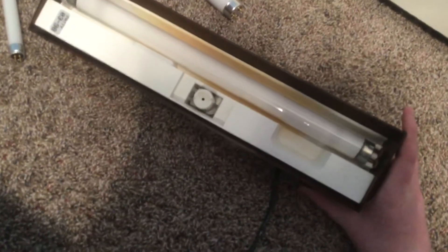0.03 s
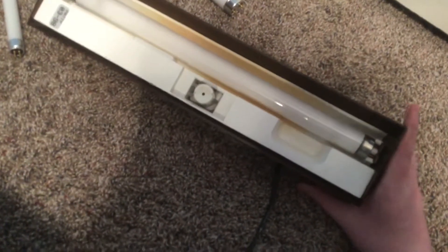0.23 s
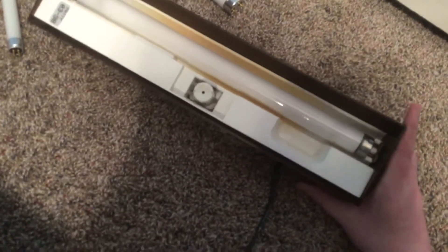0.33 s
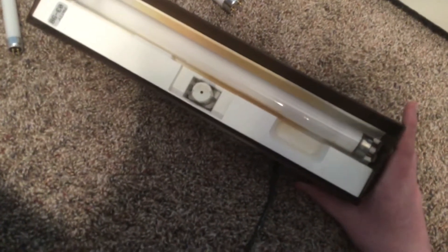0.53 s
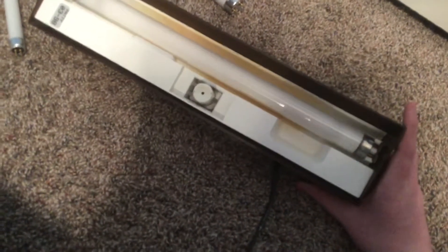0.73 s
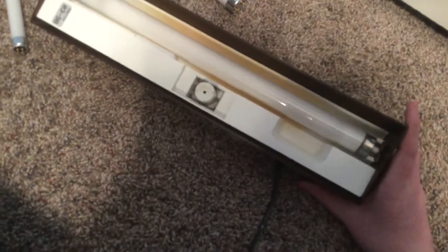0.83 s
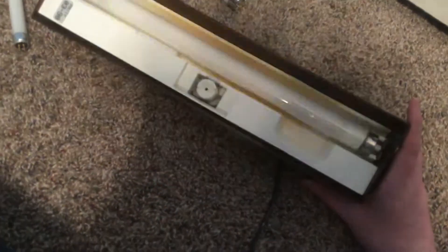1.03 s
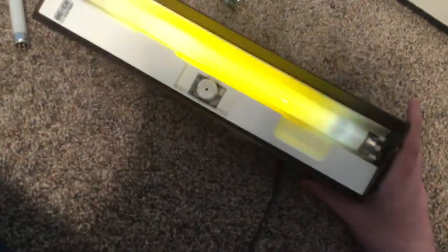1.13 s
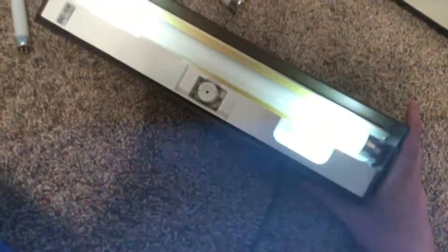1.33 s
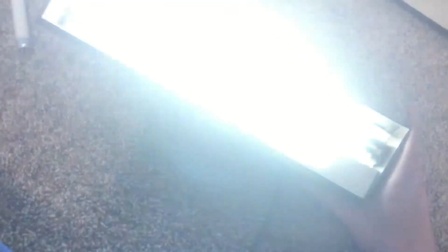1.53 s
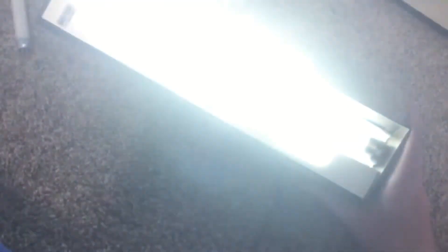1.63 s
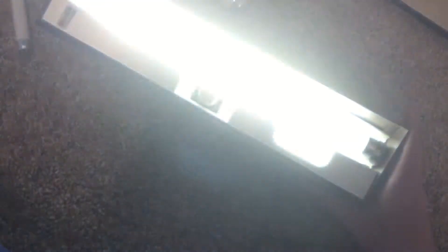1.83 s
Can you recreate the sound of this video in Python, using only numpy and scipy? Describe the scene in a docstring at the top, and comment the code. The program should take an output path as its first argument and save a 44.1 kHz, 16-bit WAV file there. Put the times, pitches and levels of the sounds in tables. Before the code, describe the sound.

A push switch clicks sharply, close by, at about 0.2 seconds and springs back with a second click at 0.35. A fluorescent tube's starter gives much weaker glassy pings near 0.85, 1.05, 1.2 and 1.5 seconds, the middle two doubled. From 1.5 seconds the lit tube holds a very faint, high, pulsing whine and thin sizzle. A soft low room rumble runs throughout, with little echo.

```python
"""A push switch clicks down and springs back, close by, over the low rumble of a carpeted room.
Each throw cracks the contacts and rings the housing. A fluorescent tube then tries to strike:
its starter pings six times, ringing a small glass bulb and knocking the fitting's casing.
Once lit, the tube gives a faint high whine and a thin sizzle, both pulsing with the mains."""
import sys
import numpy as np
from scipy import signal
from scipy.fft import rfft, irfft
from scipy.io import wavfile
from scipy.ndimage import uniform_filter1d

SR = 44100
rng = np.random.default_rng(int(sys.argv[2]) if len(sys.argv) > 2 else 0)


def dump(signal):
    """Clip the signal to [-1, 1] and save it as 16-bit WAV at the path in sys.argv[1]."""
    limited = np.clip(np.atleast_2d(signal).T, -1, 1)
    pcm = np.round(limited * 32767).astype(np.int16)
    wavfile.write(sys.argv[1], SR, pcm)


N = 83790
TIME = np.arange(N) / SR
ROOM_ONSET_S = .005
TILT_PIVOT_HZ = 11170


def from_db(db):
    """Decibels to gain."""
    return 10 ** (np.asarray(db) / 20)


def noise(colour, white=None):
    """Unit-rms noise, shaped by rows of frequency in Hz, relative density in dB."""
    points_hz, points_db = np.array(colour, float).T
    white = rng.standard_normal(N) if white is None else white
    hz = np.maximum(np.fft.rfftfreq(N, 1 / SR), 1)
    gain = from_db(np.interp(np.log(hz), np.log(points_hz), points_db))
    x = irfft(rfft(white) * gain, N)
    return x / x.std()


def strike(start_s, rise_s, t60_s):
    """Envelope of a blow: linear rise, exponential decay."""
    age_s = np.maximum(TIME - start_s, 0)
    return np.minimum(age_s / rise_s, 1) * np.exp(-np.log(1000) * age_s / t60_s)


def ring(start_s, rise_s, modes, build_cycles=2.5):
    """Struck, damped modes: low ones build up later, neighbours swing in opposite directions."""
    out = 0
    for k, (hz, db, t60_s) in enumerate(modes):
        envelope = strike(start_s, rise_s + build_cycles / hz, t60_s)
        out += (-1) ** k * from_db(db) * envelope * np.sin(2 * np.pi * hz * (TIME - start_s))
    return out


def swell(colour, levels, window_s=.06):
    """Noise, evened out, then led along a level curve."""
    x = noise(colour)
    times_s, db = np.transpose(levels)
    power = uniform_filter1d(x ** 2, int(window_s * SR))
    power = uniform_filter1d(power, int(window_s * SR / 2))
    return from_db(np.interp(TIME, times_s, db)) * x / np.sqrt(power + 1e-9)


def rumble(floor_db=-61.5, drone_half_width_hz=5):
    """Room rumble and hiss with wavering drones; two low bands an octave apart swell separately."""
    # Each row: frequency in Hz, relative density in dB.
    floor_colour = [(20, -41), (32, -29), (50, -13), (75, -8), (105, -9), (150, -11), (190, -9), (290, -13),
                    (380, -23), (480, -28), (1000, -36.5), (1600, -43), (2400, -44.3), (4500, -51),
                    (12000, -52), (15000, -50), (15800, -63)]
    deep_colour = [(30, -55), (52, -19), (65, -1), (74, 1), (88, -5), (105, -14), (400, -120)]
    octave_colour = [(90, -45), (120, -12), (140, 1), (160, -5), (180, -13), (550, -120)]
    # Each row: time in seconds, level in dB.
    deep_levels = [(0.03, -51), (0.075, -62), (0.13, -53), (0.23, -59), (0.31, -53), (0.45, -59),
                   (0.8, -59), (0.9, -54), (1.12, -53), (1.2, -59), (1.34, -52), (1.5, -60), (1.63, -65),
                   (1.74, -60), (1.82, -52), (1.9, -57)]
    octave_levels = [(0, -61), (0.2, -53), (0.29, -60), (0.41, -66), (0.48, -58), (0.57, -60), (0.63, -52),
                     (0.72, -60), (0.81, -55), (1.06, -65), (1.15, -55), (1.21, -65), (1.27, -58),
                     (1.56, -56), (1.64, -65), (1.82, -51), (1.9, -57)]
    # Each row: centre in Hz, level in dB.
    drones = [(222, -71), (284, -70), (408, -84)]
    out = from_db(floor_db) * noise(floor_colour)
    hz = np.fft.rfftfreq(N, 1 / SR)
    for centre_hz, db in drones:
        peak = 1 / (1 + ((hz - centre_hz) / drone_half_width_hz) ** 2)
        drone = irfft(rfft(rng.standard_normal(N)) * peak, N)
        out += from_db(db) * drone / drone.std()
    return out + swell(deep_colour, deep_levels) + swell(octave_colour, octave_levels)


def room(x, t60_s=.16, wet_db=-17):
    """Short diffuse tail of a furnished room."""
    # Each row: frequency in Hz, relative density in dB.
    tail_colour = [(200, 0.5), (1000, 1.5), (3000, 0.5), (7000, -1), (9800, 2.5), (11200, -1), (13000, -2),
                   (16000, -2.5)]
    tail = noise(tail_colour) * strike(ROOM_ONSET_S, ROOM_ONSET_S, t60_s)
    return from_db(wet_db) * signal.fftconvolve(x, tail / np.linalg.norm(tail))[:N]


def hand():
    """Faint rustles that swell and fade, like a hand on the fitting."""
    # Each row: crest time in seconds, length in seconds, level in dB.
    rustles = [(0.695, .05, -81), (1.70, .07, -82)]
    # Each row: frequency in Hz, relative density in dB.
    rustle_colour = [(800, -14), (1700, -6), (2500, 0), (3300, -9), (6000, -20), (16000, -30)]
    envelope = sum(from_db(db) * np.exp(-(2 * (TIME - crest_s) / length_s) ** 2)
                   for crest_s, length_s, db in rustles)
    return noise(rustle_colour) * envelope


def lamp(mains_hz=59.98, crest_s=1.713, whine_hz=11158, sizzle_lead_s=.0005):
    """The tube's whine swells once per mains cycle, its sizzle twice."""
    # Each row: time in seconds, whine crest level in dB, sizzle crest level in dB.
    levels = [(0.83, -115, -110), (0.9, -90, -91), (1.46, -90, -91), (1.5, -76, -76), (1.62, -77, -76),
              (1.68, -67.5, -76), (1.76, -66, -76), (1.9, -72.5, -76)]
    # Each row: frequency in Hz, relative density in dB.
    sizzle_colour = [(4000, -22), (8800, -14), (9800, 1), (11500, 2), (12200, -16), (13200, -5),
                     (15000, -2), (15500, -22)]
    times_s, whine_db, sizzle_db = np.transpose(levels)
    mains_rad = 2 * np.pi * mains_hz * (TIME - crest_s)
    whine = np.cos(mains_rad / 2) ** 4 * np.sqrt(2) * np.sin(2 * np.pi * whine_hz * TIME)
    whine *= from_db(np.interp(TIME, times_s, whine_db))
    repeat_share = .7  # of the sizzle's power, the same in every cycle
    repeating = np.resize(rng.standard_normal(round(SR / mains_hz)), N)
    white = np.sqrt(repeat_share) * repeating + np.sqrt(1 - repeat_share) * rng.standard_normal(N)
    pulses = np.abs(np.cos(mains_rad + 2 * np.pi * mains_hz * sizzle_lead_s)) ** .9
    sizzle = from_db(np.interp(TIME, times_s, sizzle_db)) * pulses * noise(sizzle_colour, white)
    return whine + sizzle


def voiced(modes, tilt_db_oct=0, spread_db=2):
    """Modes as one ping excites them: tilted in brightness, each slightly random in strength."""
    return [(hz, db + tilt_db_oct * np.log2(hz / TILT_PIVOT_HZ) + spread_db * rng.uniform(-1, 1), t60_s)
            for hz, db, t60_s in modes]


def starter(rise_s=.0009, knock_db=-2):
    """Each try at striking the tube ticks the contacts, rings the glass bulb and knocks the casing."""
    # Each row: start in seconds, bulb, contact and casing gains in dB, tilt in dB per octave.
    pings = [(0.8497, -39.5, -46, -64.5, -7), (1.0364, -50, -45.5, -56.5, 7), (1.0598, -50.5, -50, -68, 4),
             (1.2112, -38, -42, -57, 3), (1.2344, -55, -55, -74, 2), (1.4771, -38.5, -42, -60, 0)]
    # Each row: mode frequency in Hz, relative level in dB, T60 in seconds.
    bulb_modes = [(6300, -28, .016), (8430, -24, .025), (9400, -13, .02), (9850, -8, .017),
                  (10400, -14, .018), (11170, 1, .024), (12750, -18, .02), (13200, -13, .014),
                  (14200, -17, .014), (14900, -7.5, .016)]
    casing_modes = [(1100, -5, .03), (1560, -5, .03), (1970, -1, .028), (2750, -4, .022), (3150, -6, .022),
                    (4490, -4, .02), (5350, -12, .02)]
    # Each row: frequency in Hz, relative density in dB.
    knock_colour = [(300, -9), (1000, -0.5), (1900, 0), (2800, -2), (3700, -7), (8000, -9), (16000, -13)]
    contact_colour = [(5000, -38), (7800, -19.5), (10000, 1), (12200, -8), (15000, -3.5), (16000, -22)]
    knock = from_db(knock_db) * noise(knock_colour)
    out = 0
    for start_s, bulb_db, contact_db, casing_db, tilt_db_oct in pings:
        tilted = [(hz, db + tilt_db_oct * np.log2(hz / TILT_PIVOT_HZ)) for hz, db in contact_colour]
        contact = noise(tilted) * strike(start_s, rise_s, t60_s=.016)
        bulb = ring(start_s, rise_s, voiced(bulb_modes, tilt_db_oct))
        casing = ring(start_s, rise_s, voiced(casing_modes))
        casing += knock * strike(start_s, rise_s, t60_s=.028)
        out += from_db(bulb_db) * bulb + from_db(contact_db) * contact + from_db(casing_db) * casing
    return out


def finger(housing_modes, rise_s=.002, softness_hz=3500, rock_s=.2945):
    """A soft fingertip rubs the button, barely moving the high modes; the held button rocks once."""
    # Each row: start in seconds, rub level in dB, rub T60 in seconds, housing gain in dB.
    rubs = [(0.1905, -53.5, .2, -32), (0.2937, -53, .14, -30)]
    # Each row: frequency in Hz, relative density in dB.
    rub_colour = [(300, -14), (800, -3), (2000, 0), (4000, -2), (5000, -8), (7000, -7), (9000, -15),
                  (16000, -17)]
    # Each row: mode frequency in Hz, level in dB, T60 in seconds.
    button_modes = [(850, -57, .05), (1945, -49, .035), (2620, -51, .035), (3945, -50, .024)]
    softened = [(hz, db - 20 * np.log10(1 + (hz / softness_hz) ** 2), t60_s)
                for hz, db, t60_s in housing_modes]
    friction = noise(rub_colour)
    out = ring(rock_s, rise_s, button_modes)
    for start_s, rub_db, t60_s, ring_db in rubs:
        out += from_db(rub_db) * strike(start_s, rise_s, t60_s) * friction
        out += from_db(ring_db) * ring(start_s, rise_s, softened)
    return out


def bounce(rise_s=.0004):
    """The switch's parts clack as they settle after each throw."""
    # Each row: start in seconds, level in dB, T60 in seconds.
    clacks = [(0.2122, -28, .012), (0.3573, -30, .012), (0.3612, -36, .012)]
    # Each row: frequency in Hz, relative density in dB.
    clack_colour = [(400, -18), (1000, -4), (2200, -4), (3200, -7), (4100, 1), (5200, -3), (7000, -2),
                    (9000, -8), (16000, -16)]
    envelope = sum(from_db(db) * strike(start_s, rise_s, t60_s) for start_s, db, t60_s in clacks)
    return noise(clack_colour) * envelope


def snap(start_s, throw, modes):
    """One throw: contact crack, housing ring, dull body knock and their scatter in the room."""
    # Each row: frequency in Hz, relative density in dB.
    crack_colour = [(300, -16), (1000, -7), (2500, 0), (5000, -2.5), (8000, -1), (11500, 0), (15000, 0),
                    (16000, -6)]
    knock_colour = [(100, -10), (270, 4), (480, -10), (650, -8), (900, 0), (1500, -3), (2500, -2),
                    (5000, -10), (16000, -22)]
    scatter_colour = [(200, -4), (500, -6), (850, 2), (1350, 1.5), (1700, -1), (2500, 2.5), (3200, -2),
                      (4100, 0), (5500, -4), (8000, -4), (11000, -4), (13500, -1), (15300, -5),
                      (16000, -12)]
    rise_s, ring_db, crack_db, crack_t60_s, knock_db, scatter_db = throw
    crack = from_db(crack_db) * strike(start_s, rise_s, crack_t60_s) * noise(crack_colour)
    housing = from_db(ring_db) * ring(start_s, rise_s, modes)
    knock = from_db(knock_db) * strike(start_s, rise_s=.002, t60_s=.045) * noise(knock_colour)
    scatter = strike(start_s + ROOM_ONSET_S, ROOM_ONSET_S, t60_s=.195) * noise(scatter_colour)
    return crack + housing + knock + from_db(scatter_db) * scatter


def switch(press_s=.2104, release_s=.3552):
    """The button goes down and springs back, exciting the same housing differently each way."""
    # Each row: mode frequency in Hz, T60 in seconds, press level in dB, release level in dB.
    housing_modes = [(278, .1, -54, -49), (785, .06, -34, -50), (1050, .04, -39, -45),
                     (1265, .05, -32, -44), (1960, .025, -38, -40), (2230, .05, -43, -37),
                     (2425, .045, -31, -43), (2595, .036, -24.5, -43), (2730, .03, -30, -47),
                     (3420, .02, -26, -36), (3850, .028, -27, -27), (4400, .028, -28, -29),
                     (6250, .025, -30, -42), (6930, .016, -23, -25.5), (9050, .014, -25, -27),
                     (9800, .015, -22, -31), (12550, .014, -27, -23), (13150, .009, -25, -16),
                     (15100, .014, -26, -25)]
    # Each throw: rise in seconds, ring gain in dB, crack level in dB, crack T60 in seconds,
    # knock level in dB, scatter level in dB.
    press = (.0009, 0, -20.5, .02, -38.5, -43.5)
    release = (.0005, -0.5, -21.5, .016, -44, -44)
    press_modes = [(hz, db, t60_s) for hz, t60_s, db, _ in housing_modes]
    release_modes = [(hz, db, t60_s) for hz, t60_s, _, db in housing_modes]
    snaps = snap(press_s, press, press_modes) + snap(release_s, release, release_modes)
    return snaps + finger(press_modes) + bounce()


def scene():
    """Switch, starter, lamp and rustles in the room, over the rumble; mono."""
    near = switch() + starter() + lamp() + hand()
    return (near + room(near) + rumble())[None]


def record(dry):
    """Brief fade-in, then a steep low-pass."""
    fade_s, cutoff_hz = .006, 16200
    lowpass = signal.ellip(10, .2, 70, cutoff_hz, fs=SR, output="sos")
    return signal.sosfilt(lowpass, dry * np.minimum(TIME / fade_s, 1))


dry = scene()
out = record(dry)
dump(out)
```